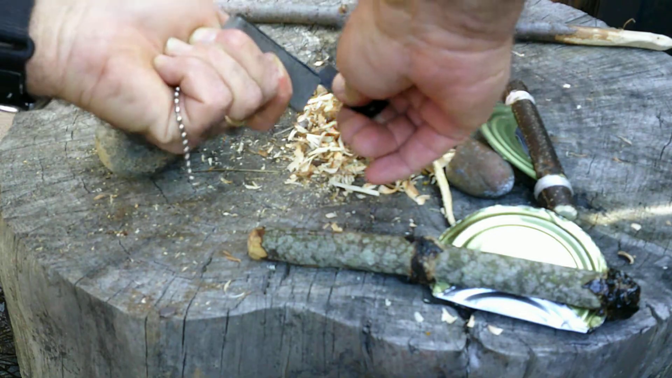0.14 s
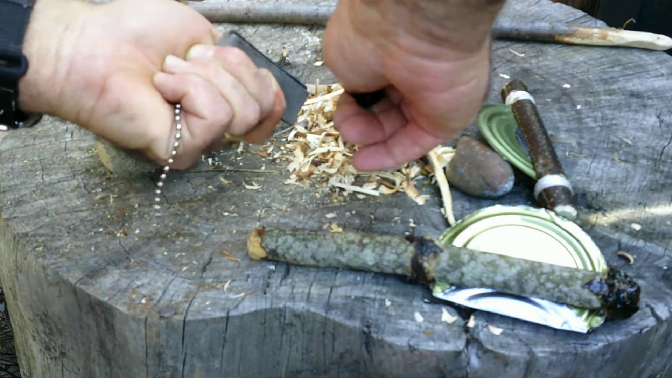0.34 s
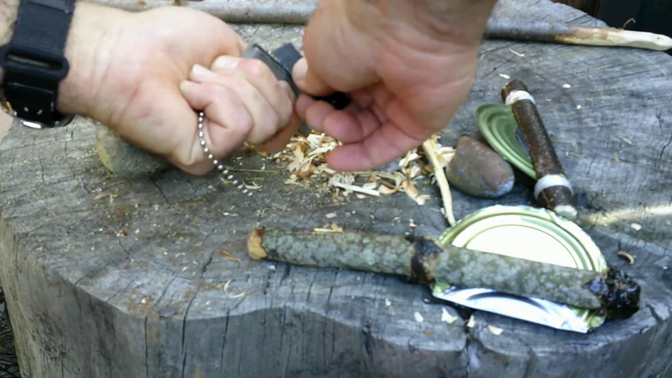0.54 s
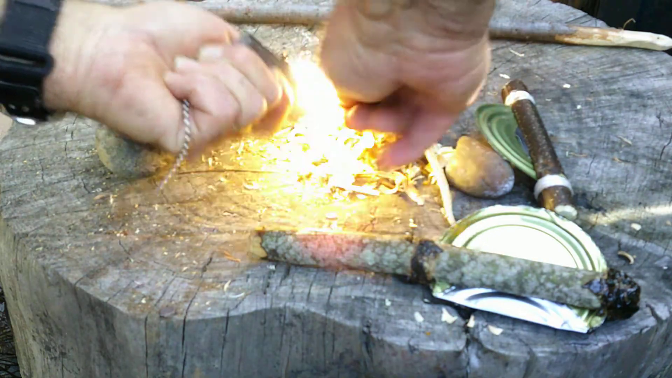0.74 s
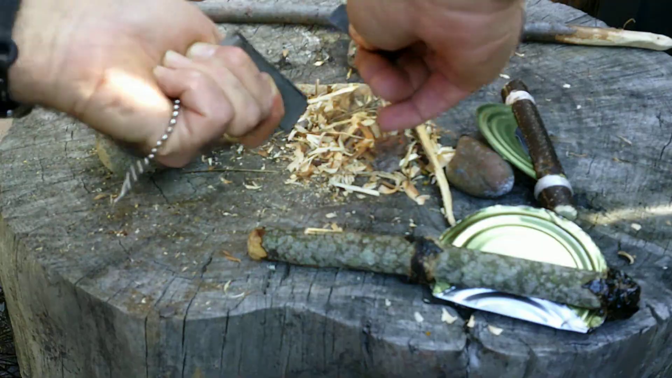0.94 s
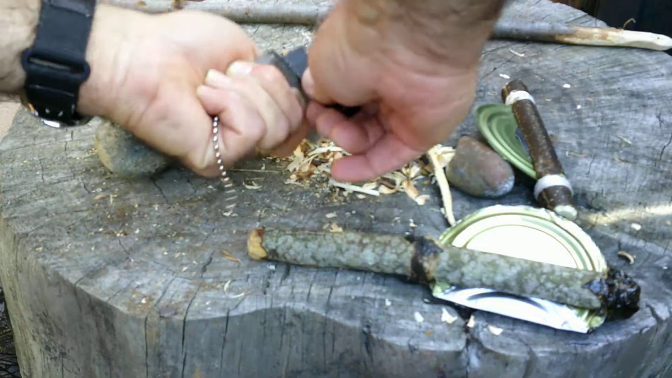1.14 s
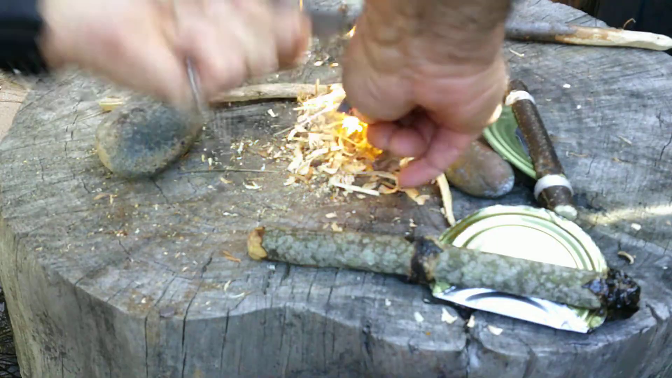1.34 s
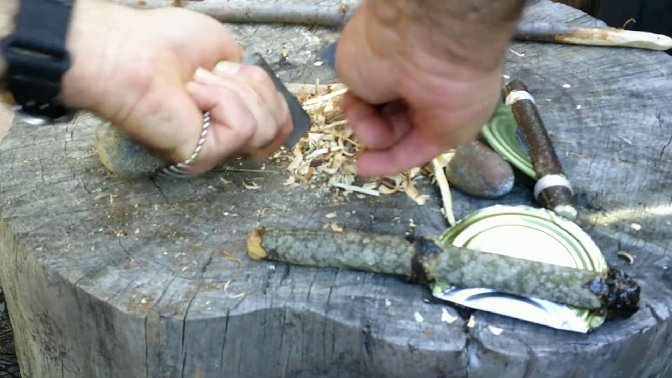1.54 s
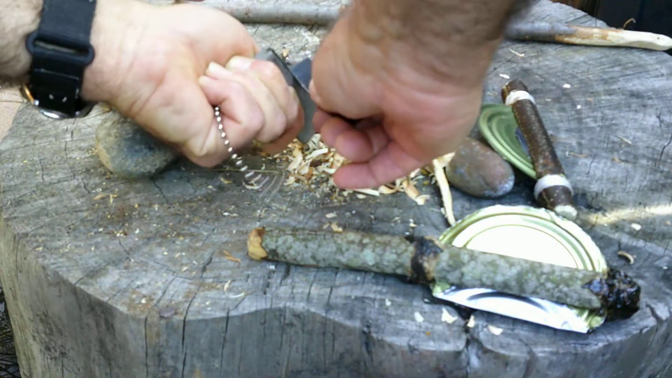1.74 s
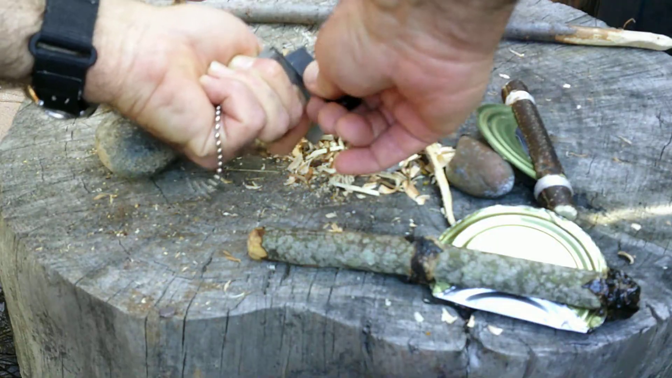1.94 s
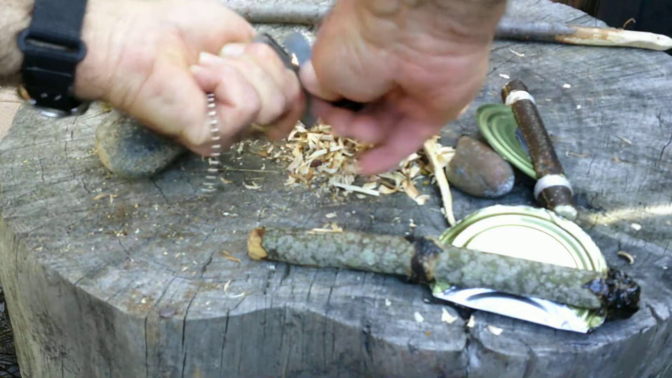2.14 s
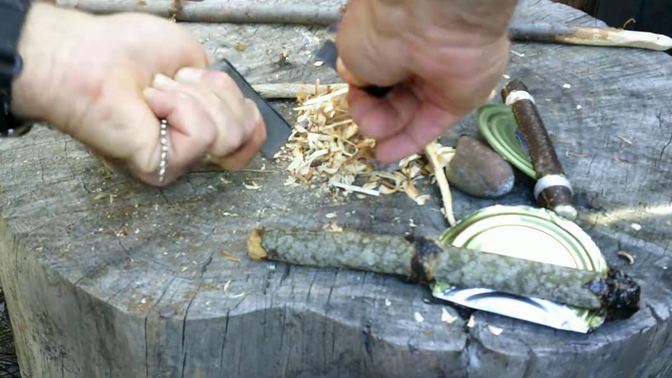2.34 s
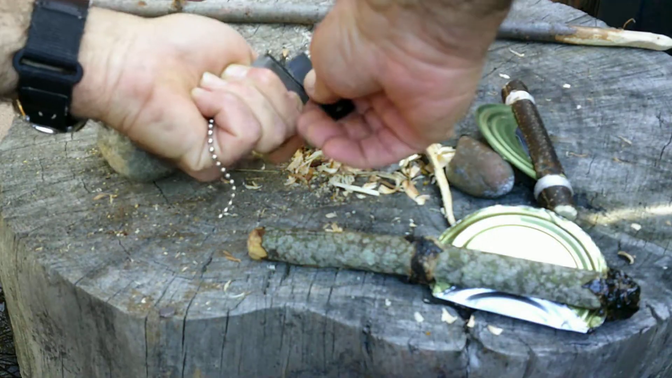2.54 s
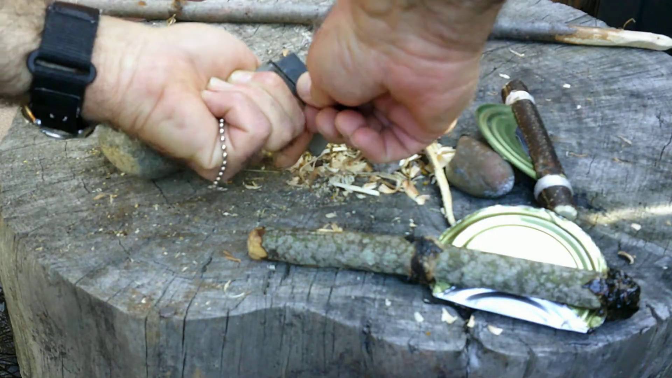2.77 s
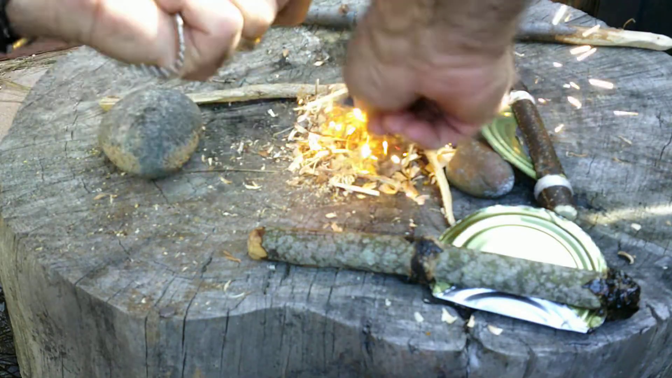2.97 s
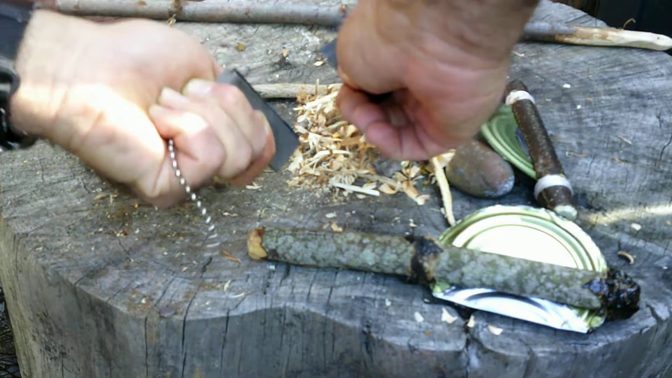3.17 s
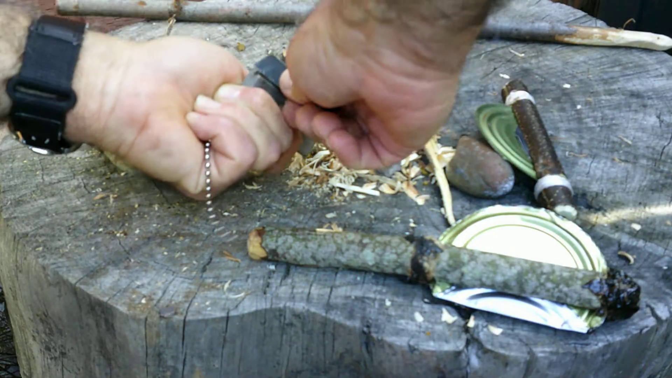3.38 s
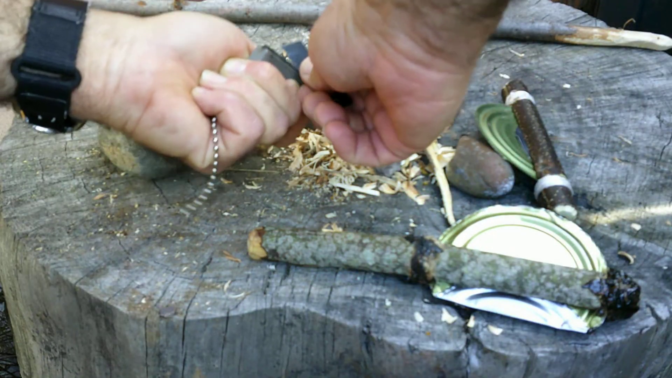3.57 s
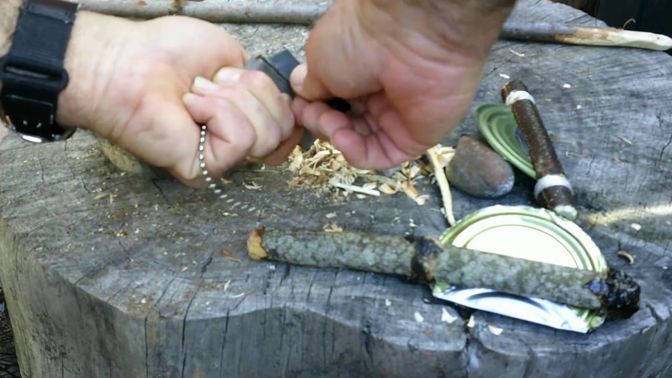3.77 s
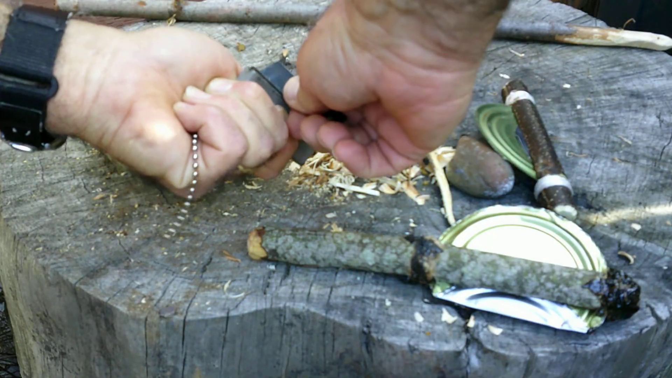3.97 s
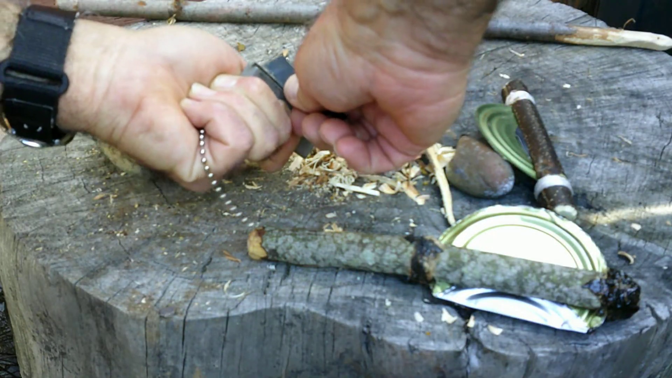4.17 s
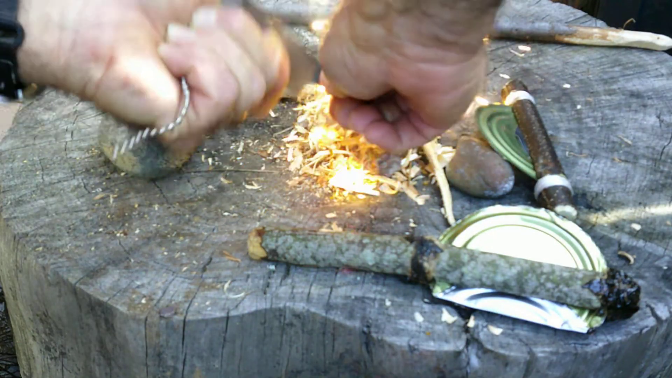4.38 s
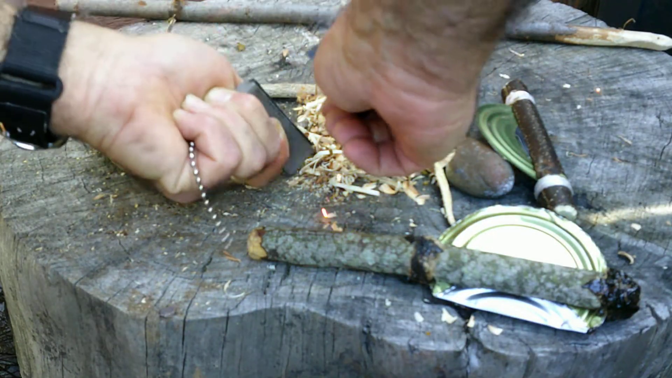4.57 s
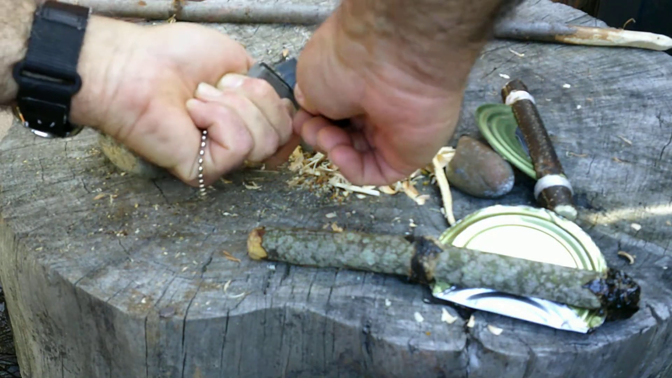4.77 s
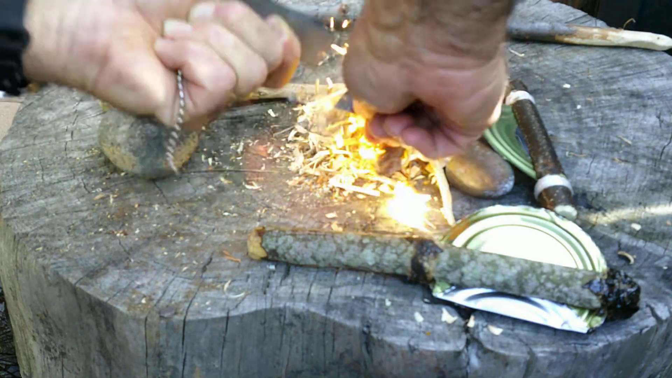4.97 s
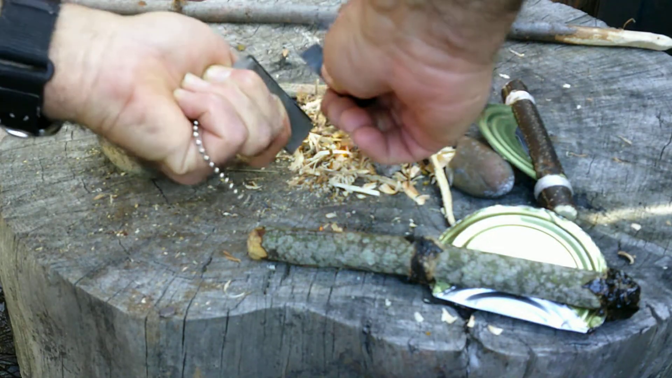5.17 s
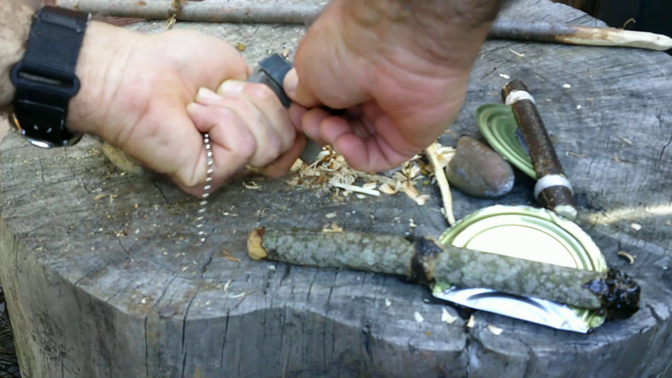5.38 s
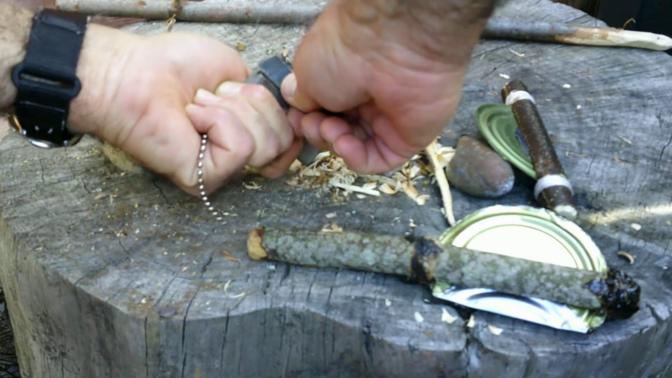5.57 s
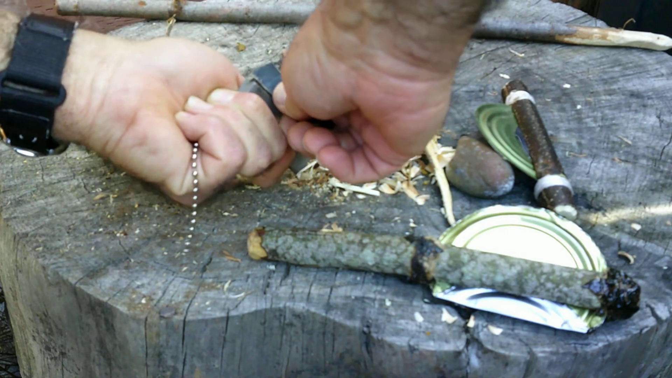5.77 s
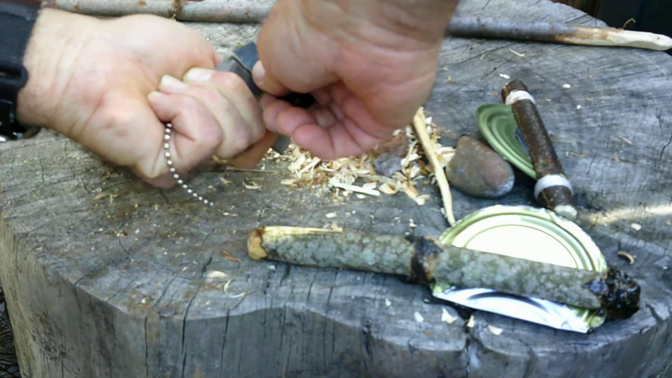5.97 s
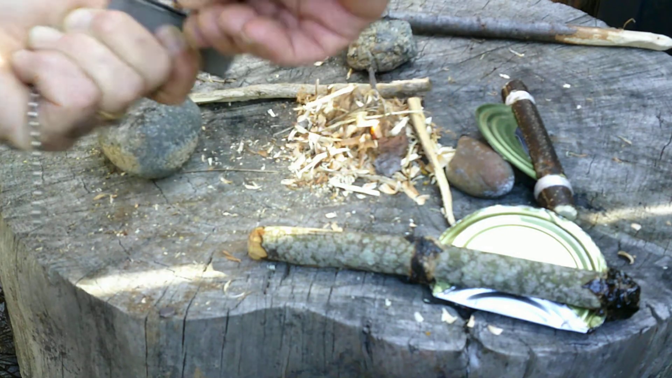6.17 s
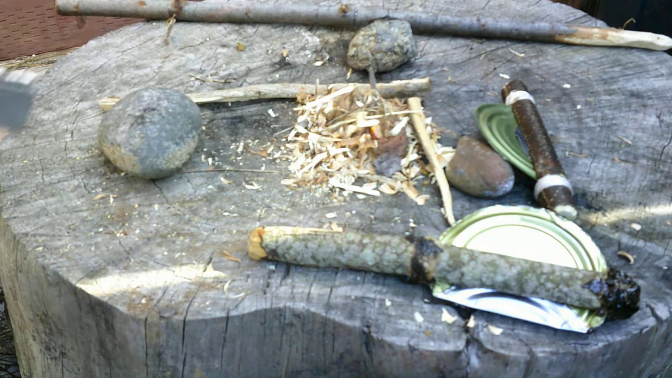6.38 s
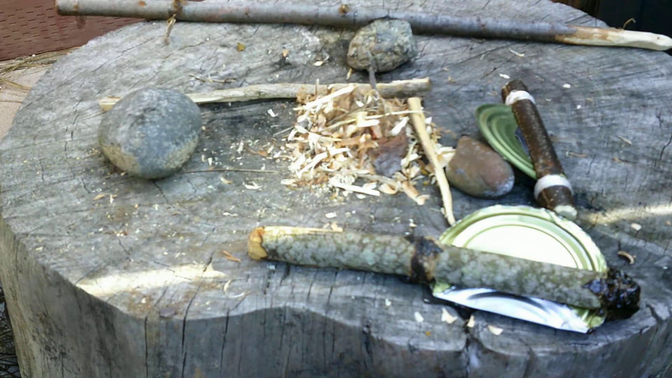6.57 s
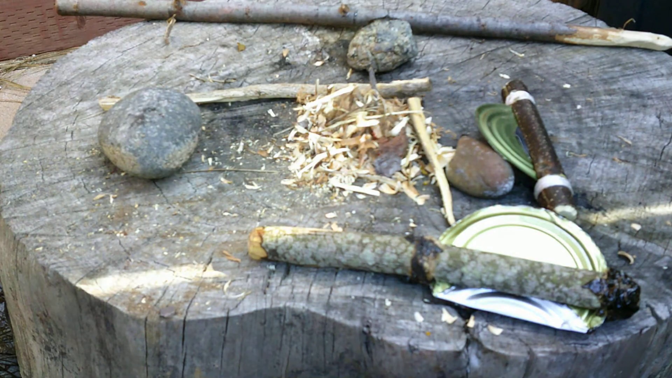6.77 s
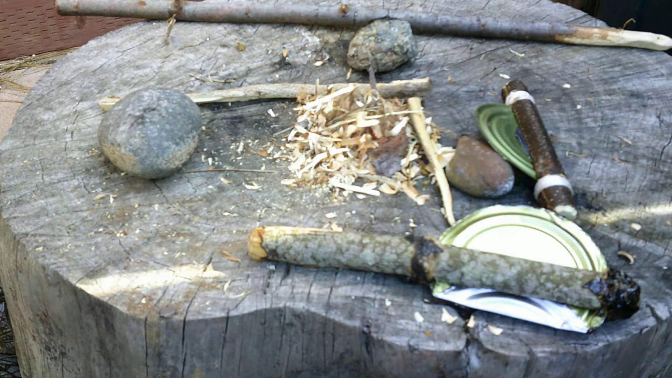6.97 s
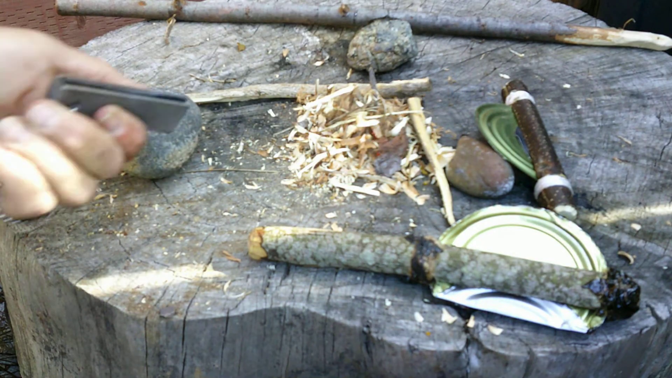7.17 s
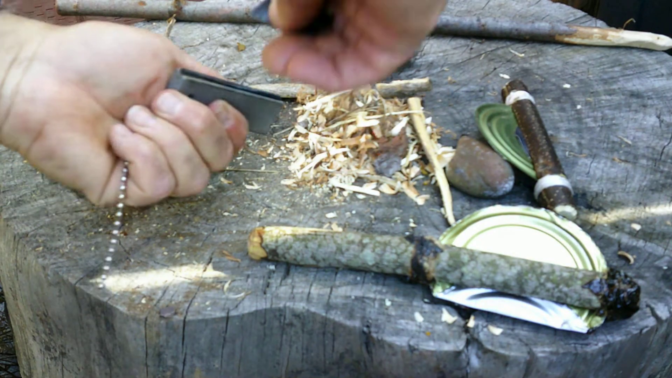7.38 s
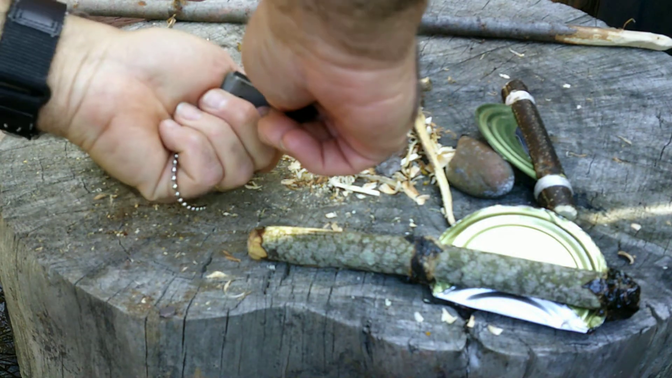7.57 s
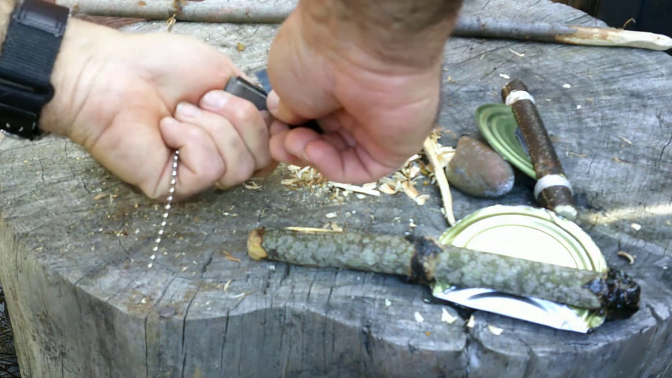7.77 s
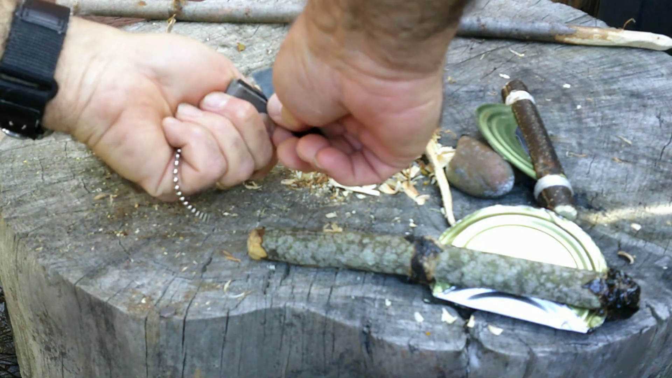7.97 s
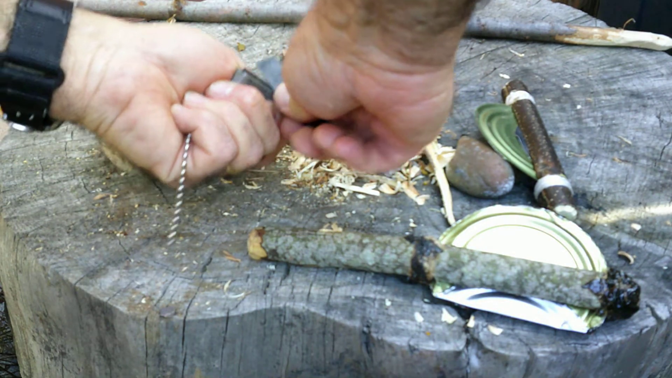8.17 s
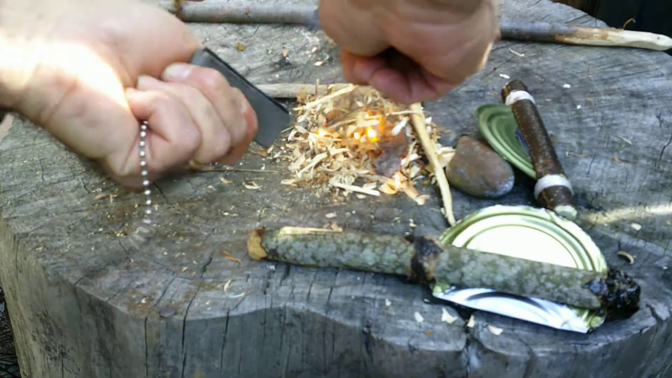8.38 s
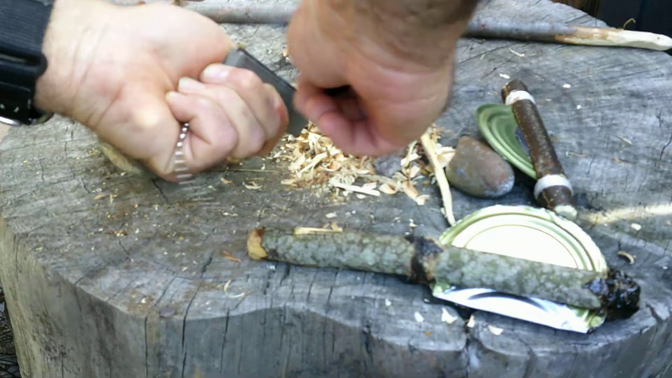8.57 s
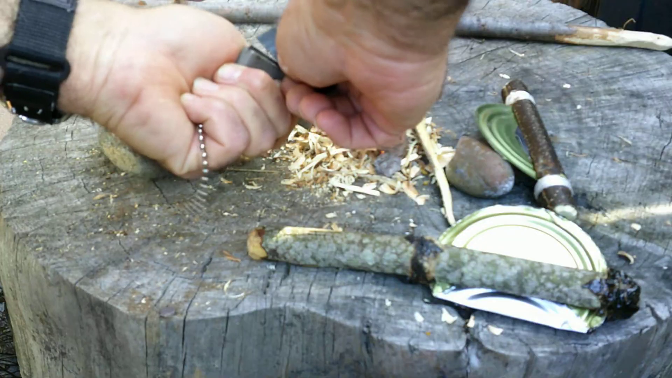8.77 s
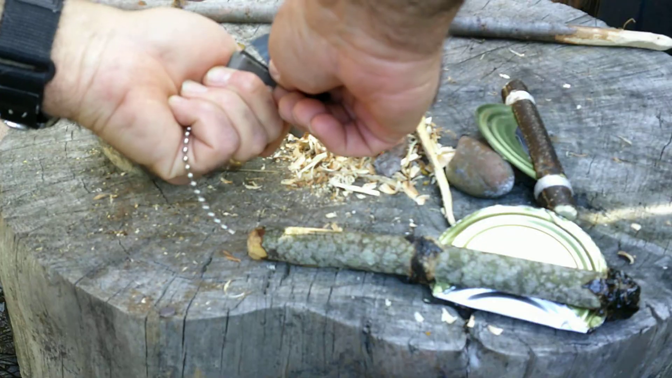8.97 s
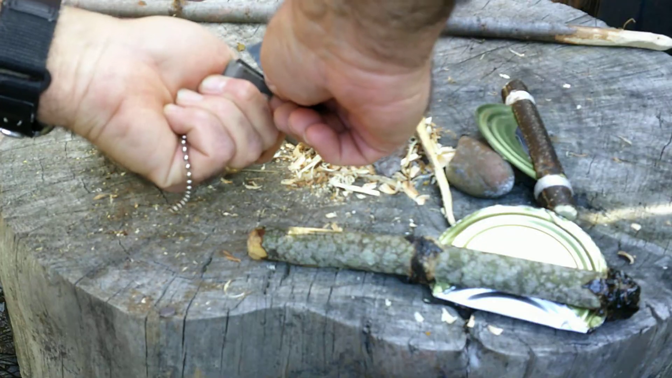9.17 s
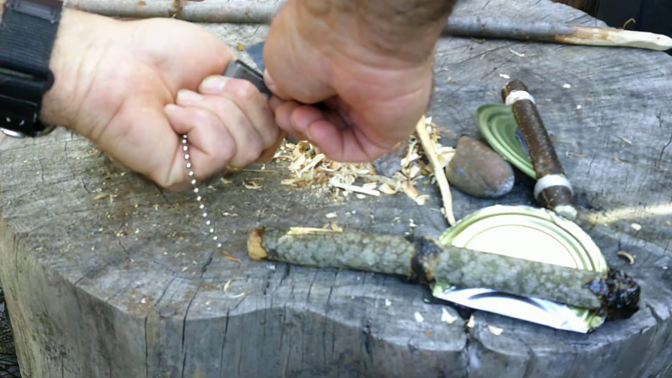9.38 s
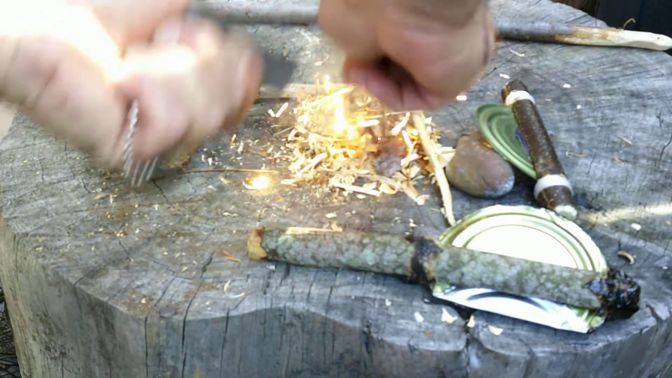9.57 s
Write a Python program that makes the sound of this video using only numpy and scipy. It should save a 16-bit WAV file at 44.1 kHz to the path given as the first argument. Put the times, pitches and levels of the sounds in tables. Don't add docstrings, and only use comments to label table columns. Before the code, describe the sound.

Outdoors, close to a small camera, a hand drags a steel scraper down a spark rod in eight brief, gritty rasps with snapping releases and a low woody thud from the stump. Between strokes steel taps steel, a bead chain jingles faintly and grit settles in shavings. A pause with light handling knocks comes after the sixth, then two more strokes. Soft air and thin distant twitter lie beneath.

```python
import sys
import numpy as np
from scipy import signal
from scipy.fft import rfft, irfft
from scipy.io import wavfile
from scipy.ndimage import uniform_filter1d

SR = 44100
rng = np.random.default_rng(int(sys.argv[2]) if len(sys.argv) > 2 else 0)


def gain_from_decibels(decibels):
    exponent = np.asarray(decibels, float) / 20
    return 10 ** exponent


def master(y):
    cut = np.clip(np.atleast_2d(y).T, -1, 1)
    pcm = np.round(cut * 32767)
    wavfile.write(sys.argv[1], SR, pcm.astype(np.int16))


N = 424683

# f/Hz, width/Hz, level/dB
STUMP_MODES = [(135, 62, -8), (164, 55, -1.5), (335, 83, -1.5), (421, 95, -1), (467, 75, 1.5),
               (628, 83, -5), (805, 50, -2.5), (982, 55, 0.5), (1434, 230, -3), (1800, 190, -3.5),
               (2044, 81, -6.5)]
ENDS_DB = 19.5


def evened(x):
    return x / np.sqrt(np.mean(x ** 2) + 1e-20)


def add(mix, s, sound):
    part = mix[round(s * SR):][:len(sound)]
    part += sound[:len(part)]


def drift():
    # t/s, level/dB
    activity = [(0.0, -65), (0.62, -88), (0.88, -77), (3.41, -78), (3.89, -99.5), (4.24, -106),
                (4.4, -80.5), (5.23, -72), (5.87, -97.5), (6.46, -71), (7.32, -71.5), (7.99, -90.5),
                (8.37, -68), (8.8, -94.5), (9.39, -91.5), (9.63, -72.5)]
    s, db = np.transpose(activity)
    return np.interp(np.arange(N) / SR, s, db - np.median(db))


def air():
    # f/Hz, level per Hz/dB
    air_spectrum = [(12, -46), (20, -15), (91, -4), (144, -3.5), (173, -5.5), (268, -10), (312, -11),
                    (364, -12), (522, -15.5), (1130, -21.5), (1500, -24.5), (3490, -32), (4870, -40),
                    (7740, -31), (9260, -52.5), (12000, -82), (20400, -120)]
    air_db = -58.5
    frames, hz = N // 256 + 5, np.fft.rfftfreq(1024, 1 / SR)
    real, imaginary, patches = rng.standard_normal((frames, 513, 3)).T
    patches = uniform_filter1d(patches, size=10, axis=0)
    patches = evened(uniform_filter1d(patches, size=12, axis=1))
    f, db = np.transpose(air_spectrum)
    colour_db = np.interp(np.log(hz + 1), np.log(f + 1), db)
    z = (real + 1j * imaginary) * gain_from_decibels(colour_db[:, None] + 1.1 * patches)
    busy_db = np.resize(drift()[::256], frames)
    rustle = np.exp(-np.log(hz / 900 + .01) ** 2 / 4.0)
    z *= gain_from_decibels(0.072 * rustle[:, None] * busy_db)
    shimmer = np.exp(-((hz - 7600) / 1200) ** 2)
    z *= gain_from_decibels(0.27 * shimmer[:, None] * busy_db)
    return gain_from_decibels(air_db) * evened(signal.istft(z, nperseg=1024, noverlap=768)[1][:N])


def thin_notes():
    # t/s,
    # length/s, f/Hz, level/dB
    clear_notes = [(1.049, .013, 7960, -75), (1.108, 0.011, 8010, -81), (1.152, .011, 7960, -70),
                   (1.682, .02, 8010, -79), (1.805, .02, 8010, -75), (1.872, .025, 7950, -73),
                   (1.898, .015, 8020, -78), (2.037, .021, 7900, -72), (3.236, .061, 8010, -84),
                   (3.308, .03, 7960, -78), (3.32, 0.073, 7610, -79), (3.433, 0.062, 7900, -84),
                   (3.57, 0.029, 7150, -79), (3.606, 0.082, 7900, -87), (3.664, 0.014, 8010, -75),
                   (3.751, .077, 7060, -83), (5.225, .012, 7900, -75), (5.307, 0.055, 7960, -81),
                   (5.34, 0.077, 7710, -83.5), (5.457, 0.038, 7940, -84), (5.724, 0.084, 7640, -79),
                   (5.827, 0.063, 7150, -79.5), (7.363, 0.072, 7800, -73.5), (8.605, 0.08, 6910, -84),
                   (9.33, 0.076, 7600, -81)]
    faint_db, faint_per_s = -84, 33
    out, busy_db = np.zeros(N), drift()
    faint = []
    for when, long, low, vary in rng.random((round(faint_per_s * N / SR), 4)):
        length = 0.0058 + 0.048 * long ** 2
        hz = 8000 - 420 * (low < .3) + 120 * (vary - .5)
        db = faint_db + 9 * (vary - .5) + 0.47 * busy_db[int(when * N)]
        faint.append((when * N / SR, length, hz, db))
    for s, length, hz, db in clear_notes + faint:
        t = np.arange(round(length * SR)) / SR
        fuzz = 1 + 1.66 * evened(uniform_filter1d(rng.standard_normal(6000), size=90))[:len(t)]
        note = fuzz * np.sin(2 * np.pi * hz * t[:6000]) * signal.windows.tukey(len(fuzz), .2)
        add(out, s, gain_from_decibels(db) * note)
    return out


def chain():
    # t/s, peak level/dB, f/Hz
    jingles = [(0.0418, -49, 7900), (0.09, -54, 7950), (0.203, -59, 7350), (0.2394, -56, 7970),
               (0.949, -44, 7900), (1.501, -53.5, 7880), (3.082, -47.5, 7840), (4.4547, -46, 7950),
               (4.545, -57, 7930), (4.6803, -56, 7960), (4.8025, -55, 7900), (5.192, -38.5, 7460),
               (5.199, -58, 7700), (5.209, -51, 8140), (6.256, -45.5, 8100), (6.2555, -52, 3500),
               (6.252, -58, 5240), (6.267, -55, 7600), (8.4512, -54, 7940), (9.1351, -68, 7500),
               (9.1711, -64, 7600)]
    out, t = np.zeros(N), np.arange(2500) / SR
    for (s, peak_db, hz), luck in zip(jingles, rng.random((len(jingles), 4, 2))):
        beads = sum(np.sin(2 * np.pi * (hz * (1 + 0.07 * (a - .5)) * t + b)) for a, b in luck)
        add(out, s, gain_from_decibels(peak_db - 7 - 60 * t / 0.039) * np.minimum(t / 0.0018, 1) * beads)
    return out


def prompt(x):
    size, tiny = 8192, 1e-4
    level = abs(rfft(x, size))
    fold = irfft(np.log(level + tiny * level.max()), size)[:size // 2 + 1]
    fold[1:-1] *= 2
    return irfft(np.exp(rfft(fold, size)), size)[:len(x)]


def tick(peak_db, low_hz, low_db, rod_db, edge_db, rod_hz, edge_hz, t60, scatter_db, sub_db, luck,
         deep_db=0, deep_hz=2790, own_hz=6500, own_db=-9, click_db=-30, detune=0.051):
    # f/Hz, level/dB
    rod_ring = [(2790, 3), (3300, -1), (3545, 5), (3965, 0), (4220, 3)]
    # f/Hz, level/dB
    edge_ring = [(4950, 2.5), (5650, 1), (6000, 5), (6340, -2.5), (6770, 5.5), (7300, 5.5), (7650, 2.5),
                 (8300, 1)]
    signs = "---+-+--+-+-+-+"
    spread_db = 4.
    t = np.arange(3000) / SR
    modes = [(0.51 * low_hz, low_db + sub_db), (low_hz, low_db + 6.5)]
    for hz, db in rod_ring:
        off_centre_db = 8.2 * abs(hz - rod_hz) / 1000
        lowest = hz < 3000
        modes.append((deep_hz if lowest else hz, db + rod_db + deep_db * lowest - off_centre_db))
    modes += [(hz, db + edge_db - 5.0 * abs(hz - edge_hz) / 1000) for hz, db in edge_ring]
    ring = 0
    for (hz, db), (a, b), sign in zip(modes, luck, signs):
        decay_db = 60 * t / t60 * (hz / 4000) ** 0.48
        tone = np.sin(2 * np.pi * hz * (1 + detune * (b - .5)) * t)
        ring = ring + int(sign + "1") * gain_from_decibels(db + spread_db * (a - .5) - decay_db) * tone
    ring = ring + gain_from_decibels(edge_db + own_db - 60 * t / t60) * np.sin(2 * np.pi * own_hz * t)
    click = gain_from_decibels(click_db) * abs(ring).max() * np.exp(-t / 0.00061) * np.sin(2 * np.pi * rod_hz * t)
    sharpness = 1 + 3.7 * gain_from_decibels(-60 * t / 0.021)
    blow = prompt(click + ring * np.minimum(t / 0.00038, 1) * sharpness)
    scatter = rng.standard_normal(1500) * gain_from_decibels(scatter_db - 60 * t[:1500] / 0.038) * (rng.random(1500) < .15)
    scatter[round(.0066 * SR)] += gain_from_decibels(-24.0)
    blow = blow + signal.fftconvolve(blow, scatter)[:len(t)]
    return gain_from_decibels(peak_db) * blow / abs(blow).max()


def small_ticks():
    # t/s, peak level/dB, knock f/Hz, rod minus knock/dB, edge minus knock/dB
    handling = [(0.042, -47.5, 1700, 3, 7.5), (0.9493, -44.5, 1190, 18, 27), (1.7082, -35, 1800, 3.5, -5.5),
                (1.734, -40, 1910, 4, 3), (1.892, -52, 3400, -12, -18), (1.901, -56, 3500, -10, -20),
                (1.918, -42.5, 2000, 4, -1), (2.3506, -50, 1280, -1, 18), (2.374, -49, 1840, 3, 14),
                (2.616, -46, 1900, -10, -10), (3.3478, -52, 2700, 13, 5), (4.573, -48, 2010, -23, 3),
                (5.193, -40.5, 1800, -3, 6), (6.054, -50, 2900, 0, -1), (6.2526, -43.5, 1570, 4, 16),
                (6.316, -50, 1460, -7, -1), (6.4985, -49, 2700, -19, -7), (6.565, -52, 1500, -5, 2),
                (6.66, -52, 1530, -5, -4), (6.775, -53, 2000, -10, -2), (6.762, -44.5, 1440, 6, 14),
                (6.8666, -50, 1820, -6, 0), (6.9668, -53, 1350, 9, 8), (7.183, -44.5, 2600, -20, 2),
                (7.522, -50, 2360, 14, 8), (8.6693, -41, 1900, -5, -1), (8.7131, -47.5, 2650, -12, -10),
                (8.97, -52, 1400, -8, 3.5), (3.5156, -43, 3400, -7, -2), (3.518, -45, 3300, -7, -13),
                (3.525, -36.5, 3300, -8, -6), (3.538, -45, 3400, 2, -9)]
    grit = [(2.123, -35, 2400, 2, 13), (0.6924, -41.5, 1100, -2, 6), (1.255, -34.5, 3000, -15, -11),
            (1.377, -44, 1300, -5, -1), (3.05, -44, 1590, -2.5, 0), (4.2244, -27, 2820, 15, 16),
            (4.296, -45, 1470, -14, -9), (4.324, -31, 1420, -6.5, -6), (4.374, -45, 3960, -5, 0),
            (4.395, -49, 1410, -9, -10), (4.4537, -45.5, 1230, 1, 6), (4.9687, -28.5, 1700, -7, -5),
            (5.051, -45, 1590, -7, -12), (5.0875, -43.5, 1740, 0, -2), (8.167, -44, 2790, 6, -2),
            (8.3467, -36.5, 1000, -8, -2), (8.3738, -46, 1940, -5, -18), (8.431, -45, 992, -4, -11),
            (8.451, -47.5, 1250, 9, 5), (8.5731, -37, 940, -8, -7), (9.412, -40, 2770, 3, 11),
            (9.549, -47, 1500, -6, -2), (9.576, -44, 1300, 0, 1), (9.583, -36.5, 1420, 1, 0.5)]
    out, rows = np.zeros(N), grit + handling
    for (s, peak_db, hz, rod_db, edge_db), luck in zip(rows, rng.random((len(rows), 15, 2))):
        add(out, s, tick(peak_db - 1.5, hz, 0, rod_db, edge_db, rod_hz=3500, edge_hz=7150, t60=0.0082,
                         scatter_db=-10.0, sub_db=-0.5, luck=luck))
    return out


def hard_taps():
    # t/s, peak level/dB, edge part level/dB, rod centre f/Hz, edge centre f/Hz
    tap_rows = [(0.12, -30.5, -8, 3500, 5960), (0.453, -28.5, -18.5, 3620, 5940),
                (1.068, -16, -9, 3860, 6280), (1.1683, -18, -17, 2900, 5700),
                (1.577, -19, -6.5, 4400, 7000), (1.842, -24.5, -8, 4330, 6000),
                (2.521, -27, -18, 3970, 6840), (3.293, -27.5, -40, 3280, 7960),
                (4.642, -20.5, -21, 4180, 6600), (5.253, -24, -20.5, 3130, 6050),
                (7.491, -27, -18, 3140, 7200)]
    # plate level/dB, lowest rod mode level/dB
    tap_shakes = [(6.5, -10), (3.5, -1), (-0.5, -0.5), (6, -3.5), (1, 0), (4, 3), (4.5, 0), (4, -1.5),
                  (-4, 3.5), (2, -3.5), (5.5, -1.5)]
    # lowest rod mode f/Hz, one more mode f/Hz, its level beside the edge part/dB
    tap_own = [(2790, 7500, -1), (2790, 5700, -3), (2700, 7200, -7), (2830, 8100, -11), (2790, 6500, 5),
               (2700, 6900, 4), (2630, 6500, 6), (2790, 6500, 5), (2820, 6460, -4), (2730, 6490, -3),
               (2510, 4400, -1)]
    # t/s, peak level/dB, edge part level/dB, rod centre f/Hz
    snap_rows = [(0.7348, -23, -21, 3180), (1.272, -27, -13, 3290), (1.2955, -23, -18, 2900),
                 (2.1357, -24.5, -10, 3400), (2.8535, -28.5, -25, 3470), (2.884, -28, -14, 3310),
                 (2.8905, -19, -12, 3460), (4.8795, -24, -4.5, 3380), (4.9215, -22, -17, 2910),
                 (8.2187, -17.5, -10.5, 2800), (9.4249, -25.5, 1, 2860), (9.459, -12, 5, 2600),
                 (9.461, -24, 6, 2640)]
    snap_own = (2770, 7900, -5.5)
    plate_hz, plate_db, snap_edge_hz = 1944, -24, 7300
    plate_db_per_khz = 0.5
    hard = [(*row, plate_db + plate_db_per_khz * (row[3] - 3500) / 1000) for row in tap_rows]
    hard += [(*row, snap_edge_hz, plate_db) for row in snap_rows]
    shakes = tap_shakes + [(3.6, 0.0034)] * len(snap_rows)
    owns = tap_own + [snap_own] * len(snap_rows)
    out = np.zeros(N)
    for row, luck, (shake_db, deep_db), own in zip(hard, rng.random((len(hard), 15, 2)), shakes, owns):
        s, peak_db, edge_db, rod_hz, edge_hz, low_db = row
        add(out, s + 0.00037, tick(peak_db, plate_hz, low_db + shake_db, -10, edge_db, rod_hz, edge_hz,
                                   t60=0.01, scatter_db=-20.5, sub_db=-4.5, luck=luck, deep_db=deep_db,
                                   deep_hz=own[0], own_hz=own[1], own_db=own[2], click_db=-10.5, detune=.008))
    return out


def body(modes):
    t = np.arange(3000) / SR
    ring = sum((-1) ** k * gain_from_decibels(db) * np.sqrt(width) * np.exp(-np.pi * width * t) * np.sin(2 * np.pi * hz * t)
               for k, (hz, width, db) in enumerate(modes))
    return ring / np.linalg.norm(ring)


def slips(per_s, spread_db, clump_db):
    size = gain_from_decibels(spread_db * np.minimum(rng.exponential(1, N), 5)) * rng.choice([-1., 1.], N)
    clumps = uniform_filter1d(rng.standard_normal(N), size=90)
    clumps = evened(uniform_filter1d(clumps, size=90))
    return evened(size * (rng.random(N) < per_s / SR) * gain_from_decibels(clump_db * clumps))


def snags(rows, last_s):
    marks = np.zeros(N)
    s, db = np.transpose(rows)
    marks[np.round(s * SR).astype(int)] = db
    t = np.arange(-600, 601) / SR
    return signal.oaconvolve(marks, np.exp(-.5 * (t / last_s) ** 2), "same")


def stroke(bite, push, bite_db, tip_db, drop_db, lean_db, deep_db, knock_db, bark_db, thud_db, ring_db):
    rod_by_phase = (2.5, 1.5, -6, -5, -3, -4)
    stump_by_phase = (14, 0.5, -8.5, 2.5, 7.5, 3)
    bite_s, catch_s, let_go_s, tail_s = 0.014, 0.0039, 0.046, 0.091
    touch_db, catch_db, tail_db = -45, -9.5, -24.5
    s = bite + np.cumsum([-bite_s, catch_s, bite_s - catch_s, push, let_go_s, tail_s])
    freed_db = tip_db - drop_db
    hiss_db = [bite_db + touch_db, bite_db + catch_db, bite_db, tip_db, freed_db, freed_db + tail_db]
    stump = []
    for k, (hz, width, db) in enumerate(STUMP_MODES):
        db = db + deep_db * (hz < 250) + knock_db * (k in (2, 4)) + thud_db * (k == 3)
        db = db + ring_db * (k in (5, 6)) + bark_db * (k == 7)
        stump.append((hz, width, db))
    return np.transpose([s, hiss_db, rod_by_phase, np.add(stump_by_phase, lean_db)]), stump


def swell(peak, rise, fall, hiss_db, rod_db, low_db):
    return [(s, db, rod_db, low_db) for s, db in
            ((peak - rise, hiss_db - ENDS_DB), (peak, hiss_db), (peak + fall, hiss_db - ENDS_DB))]


def graze(start, length, hiss_db, rod_db, low_db):
    rise_s, sag_db, fall_s = 0.0084, -2, 0.01
    s = start + np.array([0, rise_s, length, length + fall_s])
    return [(t, hiss_db + db, rod_db, low_db) for t, db in zip(s, (-ENDS_DB, 0, sag_db, sag_db - ENDS_DB))]


def hollow(hz, width):
    return [(hz, width, 0), (1.035 * hz, width, -3)]


def drags():
    # edge bites t/s, push length/s, hiss at bite level/dB, hiss at tip level/dB, drop on letting go/dB
    stroke_rows = [
        (0.71, 0.024, -45.5, -32.5, 26.5),
        (1.252, 0.039, -56, -34.5, 27.5),
        (2.131, 0.024, -43.5, -33.5, 27.5),
        (2.853, 0.023, -45, -39.5, 8.5),
        (4.221, 0.031, -49.5, -36.5, 9),
        (4.883, 0.044, -43, -36.5, 38),
        (8.169, 0.042, -52, -37, 11.5),
        (9.415, 0.049, -42.5, -35.5, 18),
    ]
    # stump, its deepest modes, hollow knock, upper knock, thud (level/dB)
    leans = [(1, 1.5, 3, -2, 7), (-1, 2, 3, 0.5, 4), (1, 4, 3.5, 2, 5), (0, -3, -0.5, -3.5, 0.5),
             (-1, 2.5, 1.5, 1.5, 3.5), (0, 2, 1.5, -2, 1.5), (1, 3, -2, -2.5, -1.5), (0, 2, 2, -1.5, 1.5)]
    rings = [-4, 0.8, 1, -0.5, -1.5, 0.5, -3, 0.1]
    # peak t/s, rise/s, fall/s, hiss level/dB
    settles = [
        (0.778, 0.021, 0.014, -52.5),
        (0.854, 0.011, 0.014, -62.5),
        (1.385, 0.021, .012, -87),
        (2.235, 0.053, 0.012, -62),
        (3.001, 0.03, 0.042, -53.5),
        (4.402, 0.027, 0.038, -61),
        (4.972, 0.015, 0.051, -50.5),
        (8.314, 0.041, 0.043, -54),
        (8.350, 0.0086, 0.098, -64.5),
    ]
    settle_rod_db, settle_stump_db = -4.5, 4.5
    # start t/s, length/s, hiss level/dB, rod minus hiss/dB, plate minus hiss/dB
    grazes = [
        (1.722, 0.015, -60, 8, 1),
        (2.554, 0.09, -70.5, -6.5, 6.5),
        (3.318, 0.029, -79, 10, 6),
        (3.495, 0.063, -63.5, 8.5, 10.5),
        (3.509, 0.017, -67, 13.5, 11),
        (8.57, 0.0073, -53.5, 5, 2),
        (8.67, 0.044, -67.5, 3.5, 7),
        (9.576, 0.027, -62.5, -2, 3),
    ]
    graze_hums = [1950, 1930, 3800, 3400, 2900, 2000, 1980, 1900]
    graze_width_hz = 270
    # peak t/s, rise/s, fall/s, hollow level/dB,
    # hollow f/Hz
    brushes = [(0.94, 0.008, 0.011, -51, 950), (4.576, 0.014, 0.032, -41, 480),
               (6.061, .009, 0.012, -51.5, 1070), (6.121, 0.034, 0.055, -65, 3500),
               (6.131, 0.1, 0.085, -48, 900), (5.4, .005, 0.015, -53, 950), (6.138, 0.052, .028, -57, 1450),
               (6.785, 0.0039, 0.0059, -46, 530), (6.796, 0.0071, 0.0051, -45, 1840),
               (7.122, 0.03, 0.015, -51.5, 940), (7.436, 0.029, 0.027, -55.5, 960),
               (4.581, .012, .014, -51, 850), (8.564, .004, 0.017, -59, 1600), (6.95, .6, .55, -69, 860)]
    brush_hiss_db, brush_rod_db, brush_width = -22, -18, 0.46
    found = [stroke(*row, *lean, ring_db) for row, lean, ring_db in zip(stroke_rows, leans, rings)]
    found += [(swell(*row, settle_rod_db, settle_stump_db), STUMP_MODES) for row in settles]
    found += [(graze(*row), hollow(hz, graze_width_hz)) for row, hz in zip(grazes, graze_hums)]
    for *when, db, hz in brushes:
        force = swell(*when, db + brush_hiss_db, brush_rod_db, -brush_hiss_db)
        found.append((force, hollow(hz, brush_width * hz)))
    return found


def rub(rows, drives, bodies, here):
    s, hiss_db, rod_db, low_db = np.transpose(rows)
    on = slice(round(s[0] * SR), round(s[-1] * SR))
    t = np.arange(on.start, on.stop) / SR
    levels = (hiss_db, hiss_db + rod_db, hiss_db + low_db)
    return sum(signal.fftconvolve(gain_from_decibels(np.interp(t, s, db)) * drive[on] * here[on], body(modes))
               for db, drive, modes in zip(levels, drives, bodies))


def scraping():
    # f/Hz, width/Hz, level/dB
    edge_modes = [(5140, 200, -8.5), (5600, 400, -5), (6280, 780, 1.5), (6600, 150, -1.5), (7060, 520, 5),
                  (7600, 890, 8), (8300, 730, -16)]
    # f/Hz, width/Hz, level/dB
    rod_modes = [(2624, 540, -4.5), (2860, 320, -2.5), (3250, 314, -0.5), (3490, 560, 0), (4330, 660, -6),
                 (4870, 930, -11.5)]
    # t/s, extra hiss level/dB, extra rod rasp
    # level/dB
    judders = [(0.7017, 8, -3), (0.708, 14, -4), (0.714, 8, 5), (0.728, 4.0, 15), (0.7356, -2, -1),
               (0.7397, -1, -4), (0.7736, 4, -2), (0.7796, -1, 2), (0.7875, 11, 4.0), (1.2489, 16, 3.0),
               (1.2554, 5.0, 14), (1.2634, 6.0, 5), (1.2686, 4, 0), (1.2727, 7.0, 4), (1.287, -6, 15),
               (1.295, 2.0, 11), (1.3336, 7, 18), (2.125, 13.0, 9), (2.13, -1.0, 5), (2.135, 11, 1),
               (2.1585, 1, 13.5), (2.191, 11, 1.0), (2.852, 13, 13), (2.8655, 0, 16), (2.8698, 3, 4),
               (2.884, 11, 19), (2.889, 14, 10), (2.9157, -2, 2), (2.929, 11, 4), (2.9382, 14, 5),
               (4.216, 5, 8), (4.224, 5, 5), (4.2298, 5, 0), (4.2376, 14, 14), (4.245, 1.5, 17),
               (4.2506, 11, 9), (4.2614, 17, 0), (4.2945, -8, 2), (4.2993, 4, -11), (4.879, 3, 5),
               (4.8957, 3, -0.0), (4.9105, 7, 12), (4.916, 4, 4), (4.922, -2, 17.5), (4.938, -2, -5),
               (4.9475, 2, 4), (4.9524, -7, 13), (8.1665, 2, 9.0), (8.18, 8, 17), (8.2074, 6, -2),
               (8.2128, -4, 5), (8.2197, 21.5, 13), (8.2414, 4, 7), (9.4146, -2, -1), (9.422, 6, 11),
               (9.426, 10, 3), (9.457, 7, 12), (9.503, 7, -7),
               (1.295, 6, 3), (2.168, 3, -11), (4.2555, 4, 5), (8.187, 4, 5), (8.2245, 4, -2),
               (9.4298, 13, 12), (9.432, 7.4, 6), (9.444, 5.5, 0), (9.4755, 5, -1)]
    # t/s, extra level/dB
    shoves = [(0.718, 8), (0.7389, -2.5), (0.7816, 1.5), (1.253, 24.5), (1.2748, -6), (1.2913, -1.5),
              (1.2998, 0.5), (1.318, 1), (1.3294, 5.5), (2.1252, -4), (2.1482, -10), (2.1674, 4.5),
              (2.8474, 8), (2.8619, 9), (2.8881, 5.5), (2.921, 1), (4.2145, 4.0), (4.2507, -1.5),
              (4.2641, 5.0), (4.279, -2), (4.2951, 2), (4.8785, 7), (4.8905, -2), (4.9042, 6.5),
              (4.9161, -1), (4.9288, 0), (4.9441, 3), (8.1647, 6), (8.1719, 3), (8.1894, 5.5),
              (8.2101, 1.5), (8.2378, 2), (8.2528, -1), (9.4091, -5), (9.4189, -3), (9.4261, 1),
              (9.4334, 7.5), (9.4443, 4), (9.4774, 7.5), (9.5019, 2.0)]
    edge_shares = [1.015, 1.014, 1.012, 1.013, 1.002, 1, 1.032, 1.026]
    # lower edge, middle edge, upper rod modes (level/dB)
    grips = [(2.5, 1.5, -0.5), (-2, -2.5, 1.5), (4.5, 2.5, 2.5), (-2, 3.5, 0.5), (-3.5, 0, 0.5),
             (3.5, -2, 2.5), (2, 0.1, 0.1), (-0.5, 4.5, -3.5)]
    light_grip = (0.1, 0.1, -3.5)
    judder_s, shove_s, between_db = 0.0013, 0.0037, -1.5
    spots, spot_s, shift, sway_db = 3, .0023, .06, 3.
    fine = slips(per_s=9000, spread_db=2.6, clump_db=1.8)
    coarse = evened(fine + .8 * slips(per_s=5000, spread_db=2.5, clump_db=2.))
    heavy = slips(per_s=3000, spread_db=2.5, clump_db=.8)
    ridges = judders
    fine = fine * gain_from_decibels(between_db + 0.82 * snags([row[:2] for row in ridges], judder_s))
    coarse = coarse * gain_from_decibels(between_db + 0.74 * snags([row[::2] for row in ridges], judder_s))
    heavy = heavy * gain_from_decibels(between_db + 0.92 * snags(shoves, shove_s))
    out, every = np.zeros(N), drags()
    shares = edge_shares + [1] * len(every)
    tones = grips + [light_grip] * len(every)
    lucks = rng.random((len(every), 8, 2)) - .5
    spot = (np.arange(N) / (spot_s * SR)).astype(int) % spots
    for (rows, low), luck, share, (lower_db, middle_db, upper_db) in zip(every, lucks, shares, tones):
        edge = [(hz * share, width, db + lower_db * (k < 2) + middle_db * (k in (2, 3)))
                for k, (hz, width, db) in enumerate(edge_modes)]
        rod = [(hz, width, db + upper_db * (k > 3)) for k, (hz, width, db) in enumerate(rod_modes)]
        for k in range(spots):
            chance = np.roll(luck, 3 * k, axis=0)
            steel = [[(hz * (1 + shift * a), width, db + sway_db * b)
                      for (hz, width, db), (a, b) in zip(modes, chance)] for modes in (edge, rod)]
            add(out, rows[0][0], rub(rows, (fine, coarse, heavy), (*steel, low), spot == k))
    return out


def scene():
    return (air() + thin_notes() + chain() + small_ticks() + hard_taps() + scraping())[None]


def low_pass(x):
    return signal.sosfilt(signal.butter(12, 9140, fs=SR, output="sos"), x)


def record(dry):
    dry = .22 * np.tanh(dry / .22)
    limit = signal.firwin(145, 8567, window=("kaiser", 11), fs=SR)
    return low_pass(signal.oaconvolve(dry, limit[None], "same"))


dry = scene()
out = record(dry)
master(out)
```